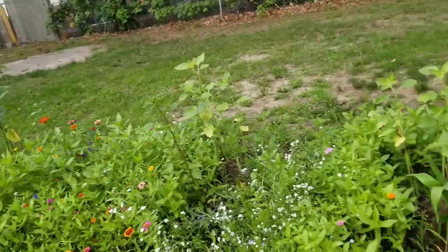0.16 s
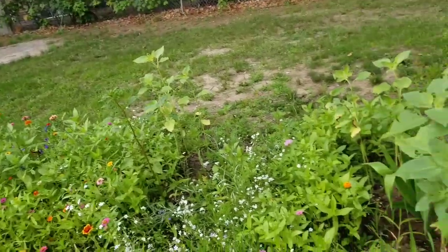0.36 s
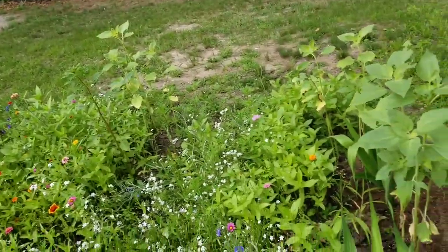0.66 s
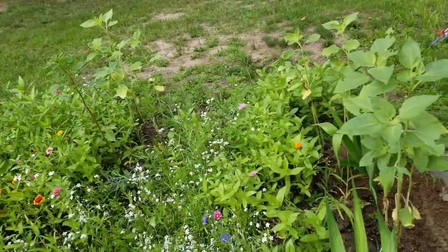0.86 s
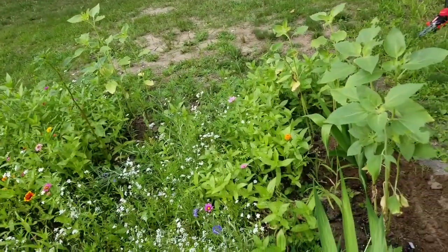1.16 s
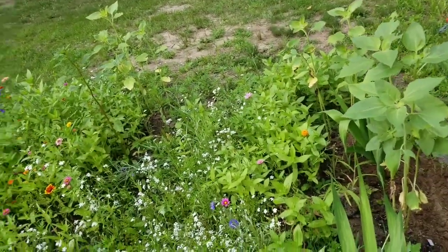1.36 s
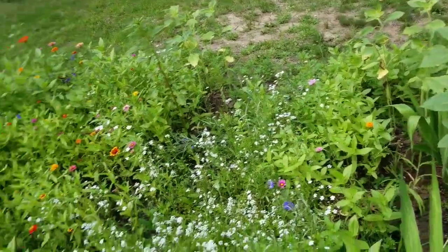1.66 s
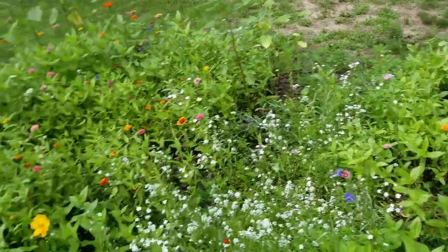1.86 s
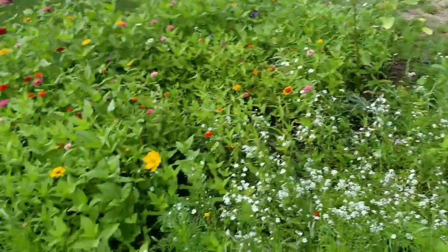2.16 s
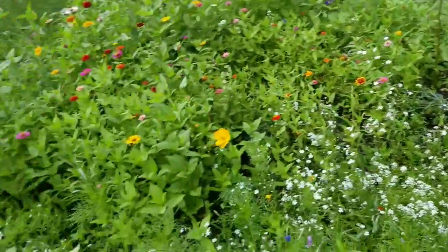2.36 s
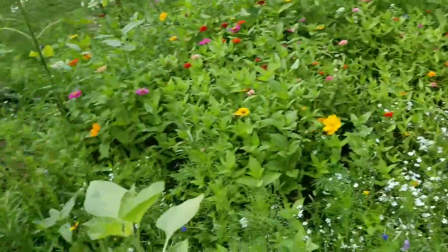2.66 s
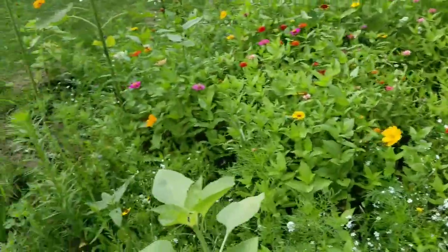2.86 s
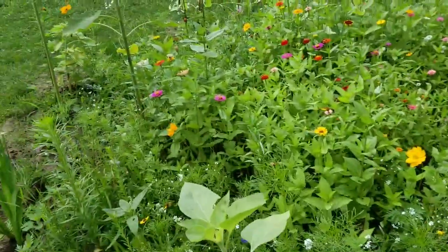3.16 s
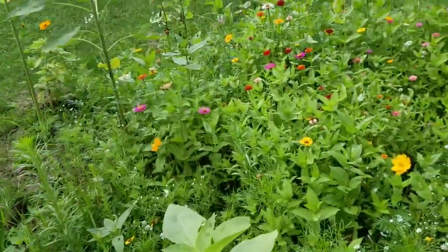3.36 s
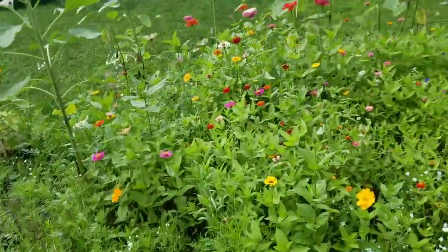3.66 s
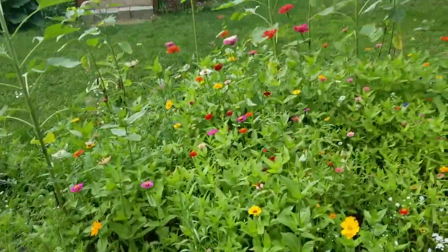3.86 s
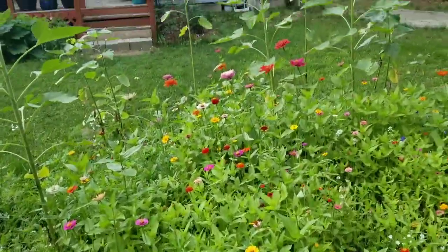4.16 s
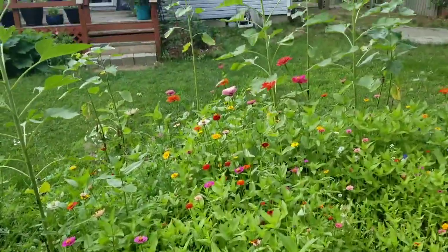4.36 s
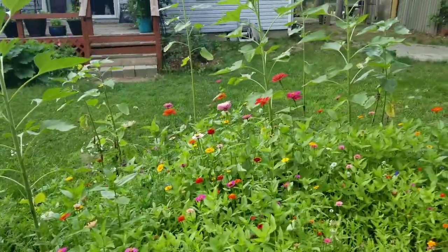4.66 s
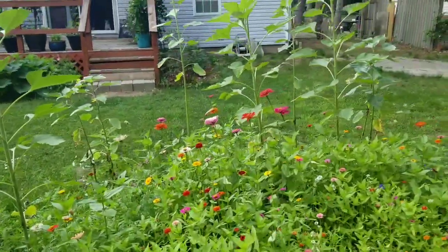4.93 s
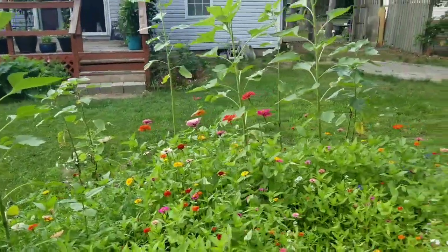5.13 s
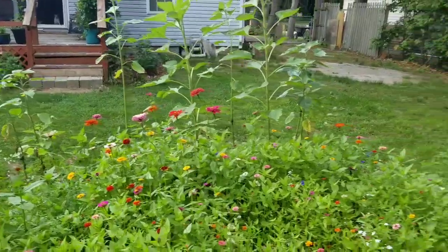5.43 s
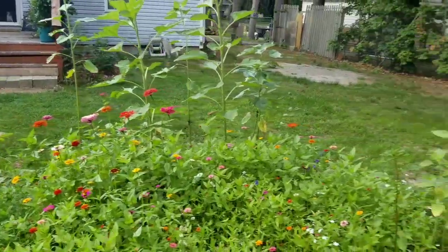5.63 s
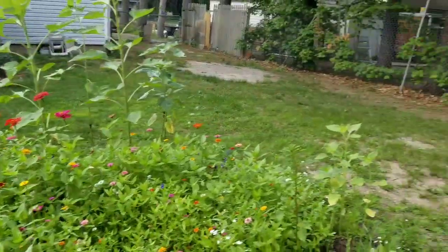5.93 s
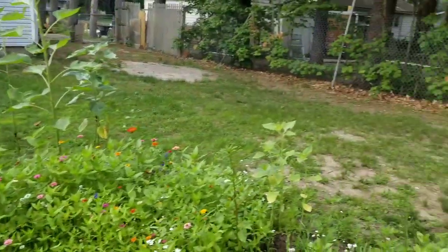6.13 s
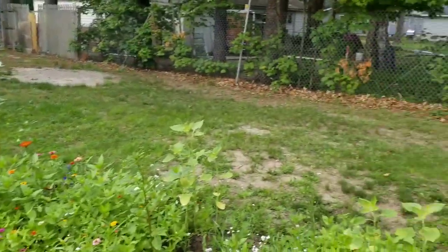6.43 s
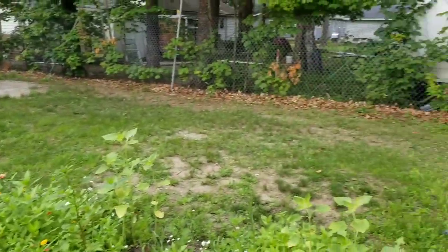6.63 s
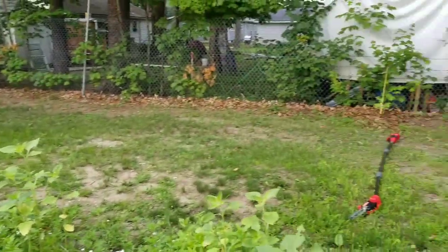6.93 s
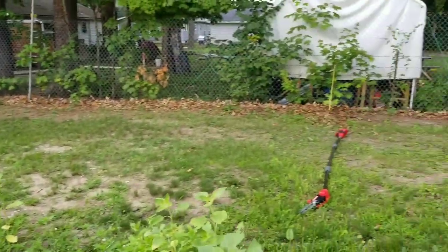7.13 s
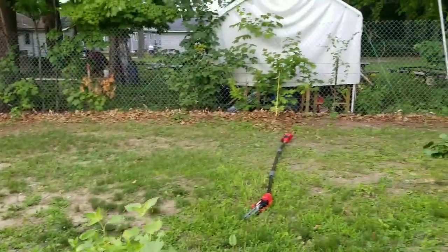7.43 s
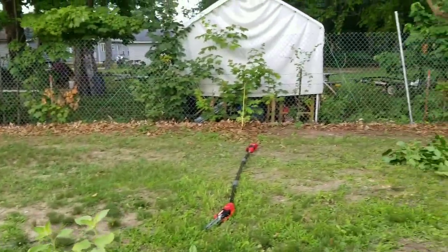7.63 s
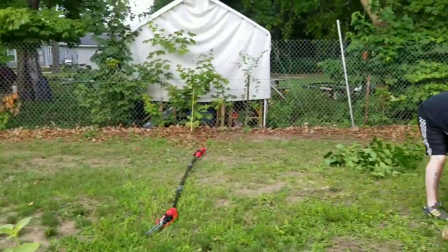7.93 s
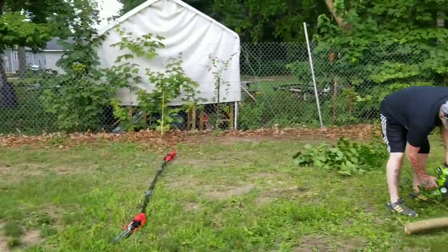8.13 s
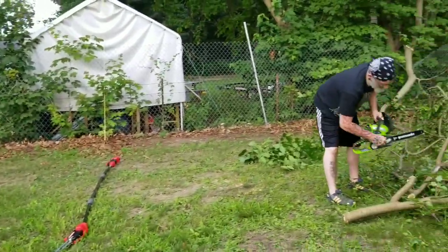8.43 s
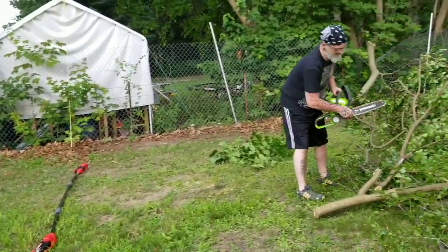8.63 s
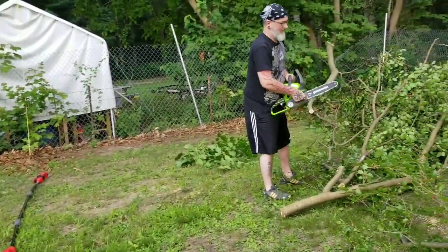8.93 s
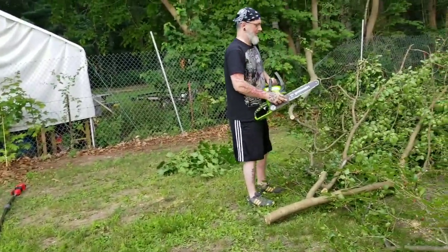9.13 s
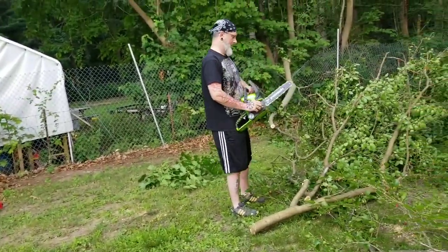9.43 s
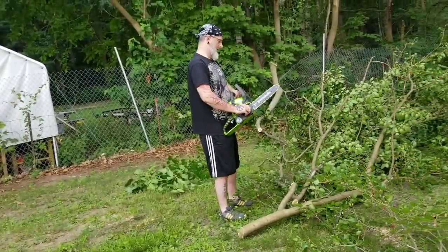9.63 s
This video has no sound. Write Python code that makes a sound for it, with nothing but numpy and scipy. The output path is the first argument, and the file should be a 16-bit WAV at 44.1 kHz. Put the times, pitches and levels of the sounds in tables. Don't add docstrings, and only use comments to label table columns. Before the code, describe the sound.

For the first two seconds the backyard is quiet: low distant traffic rumble, sliding engine drones and a little wind. From about 0.6 s small twigs tick and crack, growing denser, with a loud sharp snap near 2.1 s and rustling leaves. At about 2.4 s an electric chainsaw starts abruptly, reaching full speed within a fraction of a second. Its chain makes a bright, grainy metallic rattle over a motor and gear whine. From 3.3 to 6 s the cut roughens, throbbing with wooden knocks and sharp link slaps. From 6 to 7.7 s knocks thin out and the motor pitch wavers. The bar breaks through around 7.7 s with a short rattle; at 7.9 s the chain is released, its whine falling, ticks slowing and fading until rest near 9.4 s. Traffic and an approaching car's soft tyre roar remain. The saw is brighter and louder on the right.

```python
import sys
import numpy as np
from scipy import signal
from scipy.fft import rfft, irfft
from scipy.io import wavfile

SR = 44100
rng = np.random.default_rng(int(sys.argv[2]) if len(sys.argv) > 2 else 0)


def inscribe(sig):
    pcm = np.round(np.clip(np.atleast_2d(sig).T, -1, 1) * 32767)
    wavfile.write(sys.argv[1], SR, pcm.astype(np.int16))


def to_linear_factor(level_db):
    exponent = np.asarray(level_db, float) / 20
    return 10 ** exponent


N = 431738

# (frequency [Hz], level [dB per Hz])
RUMBLE_COLOUR = [(21, -46), (35, -12.5), (75, -4), (118, -0.5), (152, -7), (188, -9.5), (372, -31.5),
                 (400, -40), (520, -96.5), (880, -120)]
# (time [s], level [dB])
RUMBLE_DB = [(0.0, -53), (0.43, -53), (0.92, -54), (4.31, -55), (7.82, -53), (9.79, -55)]
# (frequency [Hz], level [dB per Hz])
HISS_COLOUR = [(700, -29.5), (1200, -5), (2000, -10), (4500, -8), (7300, -22), (11000, -14.5),
               (15000, -9.5)]
HISS_DB = -75
# (frequency [Hz], level [dB per Hz])
ROAD_COLOUR = [(200, -9.5), (300, 2), (500, -3.5), (850, -4.5), (1100, -17), (1600, -30)]
# (time [s], level [dB])
ROAD_DB = [(0, -74), (2.3, -77.5), (9.0, -62.5), (9.5, -61), (9.79, -66.5)]
# (time [s], level [dB])
BREEZE_DB = [(0, -62), (1.0, -64), (1.9, -64), (2.35, -61), (2.6, -53), (2.85, -62), (3.2, -92),
             (9.79, -70.5)]
# (start [s], stop [s], from [Hz], to [Hz], level [dB])
DRONES = [(-0.5, 0.99, 110, 114.3, -54), (3.5, 5.0, 119.7, 138, -54), (5.6, 6.5, 143.2, 164.2, -53),
          (7.2, 8.35, 125.2, 161.7, -54.5), (8, 9.45, 187, 203, -63), (9, 9.72, 190, 215, -56),
          (8.5, 8.95, 295, 311, -62), (8.5, 9.2, 310, 322, -58.5), (9, 9.9, 320, 342, -63),
          (9.0, 9.4, 497, 466, -64), (9, 10.1, 462, 460, -62.5), (9, 9.7, 507, 500, -66),
          (9, 10.1, 2465, 2610, -88)]

# (time [s], peak [dB], ring [Hz], swish over peak [dB])
TWIGS = [(0.5989, -61, 353, -15), (0.7221, -55, 356, -6), (0.8049, -64, 3560, -10),
         (0.856, -43.5, 344, -18), (1.1262, -53.5, 2010, -10), (1.2279, -49.5, 458, -23),
         (1.313, -58, 11300, -16), (1.3342, -52, 11100, -9), (1.3684, -41, 11350, -1.5),
         (1.385, -49, 2500, -11), (1.394, -40, 1200, -16), (1.405, -35.5, 431, -23),
         (1.634, -50.5, 435, -16), (1.655, -47.5, 11000, -18), (1.676, -48, 11400, -18),
         (1.7633, -37, 1810, -10), (1.9553, -42.5, 498, -0.5), (1.9762, -39, 11100, -32),
         (2.0414, -38.5, 1160, -12), (2.074, -45, 11480, -12), (2.082, -46, 11200, -16),
         (2.091, -16.5, 560, -26), (2.095, -21, 4320, -32), (2.123, -32, 1790, -9.5),
         (2.136, -44, 3000, -13), (2.146, -45, 4500, -13), (2.1582, -42, 4390, -14),
         (2.1845, -35.5, 3850, -14), (2.187, -36.5, 11100, -16), (2.265, -30.5, 4080, -19),
         (2.295, -48, 1910, -9)]
# (time [s], level [dB])
RUSTLE_DB = [(0.0, -64), (0.2, -75.5), (0.55, -76), (0.8, -71), (1.05, -75.5), (1.5, -70), (2.0, -72.5),
             (2.17, -58), (2.4, -64)]
# (frequency [Hz], level [dB per Hz])
LEAVES_COLOUR = [(700, -4), (1500, -4.5), (4300, -3), (6000, -8), (7300, -10), (9000, -5), (11300, 0),
                 (15000, -10.5)]
TWIG_RING_DB, TWIG_DECAY_CYCLES, THIN_TWIG_DB_PER_OCTAVE = -16, 39, 6.5

# (time [s], chain level [dB])
EFFORT_DB = [(2.37, -46), (2.41, -37.5), (2.9, -35.5), (3.15, -36.5), (3.6, -31), (4.1, -33), (4.5, -33.5),
             (5.1, -33.5), (5.6, -32.5), (6.2, -32.5), (6.97, -33), (7.1, -29), (7.23, -35), (7.36, -28.5),
             (7.55, -31), (7.66, -36.5), (7.76, -31.5), (7.94, -39)]
# (time [s], pressure [0-1])
PRESSURE = [(2.4, 0.78), (3.1, 0.78), (3.9, 0.92), (5.5, 1), (5.9, 0.54), (6.3, 0.43), (7.05, 0.2),
            (7.5, 0.36), (7.9, 0.63)]
# (time [s], peak [dB])
SLAPS = [(2.364, -36), (2.3878, -47), (2.4067, -15.5), (2.5105, -20), (2.5559, -19), (2.608, -19.5),
         (2.633, -20), (2.7507, -19), (2.9325, -20), (3.0922, -28), (3.2817, -17.5), (3.3052, -19),
         (3.4204, -15), (3.4878, -19), (3.5107, -14.5), (3.5367, -14), (3.5616, -23), (3.5885, -17),
         (3.614, -18), (3.6399, -21), (3.66, -19), (3.7073, -16.5), (3.731, -11), (3.8235, -20),
         (3.8679, -19.5), (3.8918, -21), (3.9348, -23), (4.186, -21), (4.2146, -20.5), (4.2555, -19),
         (4.2775, -19), (4.351, -11.5), (4.395, -16), (4.488, -14), (4.5119, -18), (4.68, -12.5),
         (4.7025, -21), (4.721, -15), (4.911, -17), (4.981, -22), (5.031, -19), (5.1051, -27),
         (5.1275, -23.5), (5.4174, -18), (5.4423, -22), (5.4887, -20), (5.5875, -17.5), (5.6129, -12),
         (5.636, -11), (5.6598, -13), (5.7277, -21), (5.8725, -20), (5.9453, -16), (6.616, -19),
         (7.286, -23), (7.3107, -10.5), (7.4089, -14.5), (7.5046, -22.5), (7.5276, -19), (7.782, -16.5)]
# (time [s], depth [0-1])
BITE = [(2.4, 0.06), (3.2, 0.3), (3.6, 0.63), (4.3, 0.4), (5.0, 0.34), (5.7, 0.42), (6.2, 0.08),
        (7.0, 0.17), (7.5, 0.22)]
# (frequency [Hz], level [dB per Hz])
CHAIN_LOW_COLOUR = [(1250, -28.5), (1500, -9.5), (1750, -5), (2300, -8.5), (2850, -3.5), (3350, -5.5),
                    (4250, 1.5), (5000, -6), (6500, -8), (7300, -12), (8200, -51)]
# (frequency [Hz], level [dB per Hz])
CHAIN_HIGH_COLOUR = [(6500, -25), (7400, -12.5), (8400, -2.5), (9800, -1.5), (11300, -0.5), (12200, -3),
                     (13000, -4), (14500, -9.5), (15500, -19.5)]
# (frequency [Hz], level [dB per Hz])
COASTING_COLOUR = [(1150, -42), (1450, -10.5), (1700, -0.5), (1900, -5.5), (2800, -4.5), (3400, -2),
                   (4100, 1.5), (4450, 4), (4900, -2.5), (5500, -8), (7300, -12), (8200, -49)]
# (frequency [Hz], level [dB per Hz])
WOOD_COLOUR = [(60, -23), (150, -6.5), (260, -3), (450, 1.5), (600, 5), (800, -23)]
# (frequency [Hz], level [dB per Hz])
HOUSING_COLOUR = [(500, -26), (700, -3.5), (870, -2), (1050, -4), (1250, -3.5), (1450, -7.5), (1800, -35.5)]
# (time [s], level [dB])
HOUSING_SHADE_DB = [(2.4, -6), (2.9, 0), (4.4, 1.5), (5.2, -1), (6.0, -3), (6.8, -2.5), (7.3, -1.5),
                    (7.9, 1), (8.4, 1.5), (9.1, 5.5)]
SPROCKET_HZ = 42.4
RELEASE_S, STOP_S = 7.9, 9.43
COAST_POWER, THINNING_POWER = 1.2, 1.6
LAP_S, LAP_PEAK_S, LAP_DB = 0.38, 4.35, 0.16
BRIGHT_DB, BRIGHT_PRESSED_DB = -0.92, 4
BRIGHT_COAST = 0.47
BRANCH_DB, BRANCH_PRESSED_DB, HOUSING_DB = -21.5, 12, -12
BREAK_S, RATTLE_S, BREAK_DB = 7.72, 0.27, 4.5

# (time [s], speed [turns per s])
MOTOR_HZ = [(2.36, 250), (2.6, 366), (6.1, 370), (6.3, 389), (6.45, 389), (6.56, 371), (6.85, 397),
            (7.05, 406), (7.14, 394), (7.3, 411), (7.45, 356), (7.6, 343), (7.66, 401), (7.73, 411),
            (7.87, 390), (8.03, 336), (8.31, 252), (8.6, 170)]
# (time [s], level [dB])
TORQUE_DB = [(2.36, 0), (2.7, 0), (3.6, -5.5), (4.3, 0.5), (5.0, 1.5), (5.8, 4), (6.15, 2.5), (6.38, -3.5),
             (6.65, 10.5), (6.87, -5), (7.0, 2), (7.15, -12), (7.45, 6.5), (7.58, 4.5), (7.7, -6),
             (7.9, -6), (8.05, -8)]
# (level over chain [dB], share of torque [dB/dB], at full pressure [dB],
#               when free [dB], fading when free [dB per s])
HUM_LINE = (-15.5, 0.66, -6, 12, -59)
MESH_LINE = (-9.5, 1.15, 1, 2, -56)
POLE_LINE = (-24, -3, -6.5, 17.5, -60)
FAN_LINE = (-6.5, -0.8, -6, -3, -70)
MESH_ORDER, POLE_ORDER, FAN_ORDER = 10.5, 14.3, 28.7
# (start [s], stop [s], order [per turn], level [dB])
RUN_DOWN = [
    (8.01, 8.16, 14.3, -43),
    (8.08, 8.2, 13.4, -49),
    (8.23, 8.32, 14.2, -50),
    (8.0, 8.12, 11.0, -49),
]
# (start [s], stop [s], from [Hz], to [Hz], level [dB])
BAR_RINGS = [
    (2.66, 3.45, 2830, 2810, -42),
    (5.7, 6.6, 2825, 2740, -41.5),
    (6.5, 7.4, 2775, 2717, -43),
    (8.75, 9.42, 1820, 1660, -62),
    (8.75, 9.35, 1030, 992, -63),
    (8.3, 8.85, 4530, 4450, -50),
    (8.7, 9.3, 4450, 4380, -58),
]

# (time [s], peak [dB], high mode over peak [dB])
KNOCKS = [(3.278, -33.5, 6), (3.462, -30, 2), (3.755, -26, -2), (3.778, -28.5, -1), (3.823, -32.5, 8.5),
          (3.934, -31, -1), (3.96, -27, -2), (3.982, -27.5, 1), (4.156, -34, 1), (4.183, -33.5, -3),
          (4.208, -25, -4), (4.232, -25.5, -3), (4.254, -26, -4), (4.281, -32, -8), (4.304, -28, -3.5),
          (4.329, -26, -3.5), (4.349, -26.5, -3), (4.372, -26, -1), (4.424, -33, -2), (4.514, -34, 5),
          (4.536, -26.5, -2), (4.655, -31, -8.5), (4.678, -27, -8.5), (4.701, -25, -2.5), (4.723, -26, 3.5),
          (4.748, -26, -3), (4.772, -31, 5), (4.837, -36, -11), (4.866, -37.5, -6.5), (4.912, -31, -6),
          (4.96, -26, -7), (4.981, -29.5, -10), (5.028, -29, -9), (5.176, -30, -1), (5.223, -30.5, -6),
          (5.245, -30, -17), (5.35, -38, -13), (5.438, -30, -13), (5.452, -30, -8), (5.466, -27.5, -8),
          (5.49, -24.5, -4), (5.513, -27.5, -7), (5.56, -39, -6), (5.63, -33.5, -6), (5.655, -29, -5.5),
          (5.727, -25.5, -12), (5.751, -28, -2), (5.785, -30, -8), (5.845, -39.5, -8), (5.867, -37, -3.5),
          (5.936, -31, -7), (6.072, -27.5, -13), (6.218, -27, -4), (6.242, -27, -10), (6.33, -34, -6),
          (6.45, -36, -4), (6.895, -30.5, 1), (7.068, -30.5, 9), (7.304, -30.5, 3), (7.861, -34, -12)]
# (time [s], frequency [Hz])
BRANCH_HZ = [(2.8, 380), (3.7, 496), (4.7, 505), (5.6, 504), (6.2, 405), (7.0, 359), (7.3, 276), (7.9, 384)]

# (time [s], peak [dB])
LOOSE_LINKS = [(6.0496, -24), (6.2871, -26), (6.4771, -22), (6.647, -18), (6.7784, -23), (7.169, -13),
               (7.6589, -21), (8.0267, -28), (8.076, -29), (8.2916, -25), (8.32, -29), (8.33, -21),
               (8.3654, -23), (8.401, -31), (8.45, -34), (8.545, -32), (8.7585, -38.5), (8.8493, -43),
               (8.8682, -39), (8.9251, -43), (8.967, -44), (9.0503, -39), (9.1242, -43), (9.1561, -46)]
TEETH_PER_S2, TEETH_STOP_S = 122, 9.35
TICK_DB, TICK_SPREAD_DB, TICK_T60_S = 10, 5, 0.0071

# (frequency [Hz], level [dB])
SHADOW_COLOUR = [(100, 1), (300, 0.5), (1200, -3), (2500, -7.5), (4000, -15.5), (5400, -7.5), (6300, -11.5),
                 (8000, -13.5), (10000, -7), (13000, -10.5)]
# (time [s], delay [ms])
LAG_MS = [(2.5, 0.39), (3.2, 0.36), (5.3, 0.37), (6.35, 0.47), (7.05, .39), (7.75, 0.266), (8.45, 0.15),
          (9.15, 0.0069)]
# (time [s], left minus right [dB])
TURN_DB = [(2.4, -10.5), (3.24, -10), (3.92, -8), (4.7, -7), (5.5, -8), (6.2, -7.5), (6.8, -8), (7.3, -8.5),
           (7.8, -7), (8.6, -8), (9.4, -9.5)]


def time_s():
    return np.arange(N) / SR


def in_time(rows):
    s, *columns = np.transpose(rows)
    return [np.interp(time_s(), s, c) for c in columns]


def gate(start_s, stop_s, fade):
    return np.clip(np.minimum(time_s() - start_s, stop_s - time_s()) / fade, 0, 1)


def rms_one(x):
    return x / np.sqrt(np.mean(x ** 2) + 1e-20)


def coloured(x, points, size=8192):
    hz, level_db = np.transpose(points)
    grid_hz = np.maximum(np.arange(size // 2 + 1) * SR / size, 1)
    gain = to_linear_factor(np.interp(np.log(grid_hz), np.log(hz), level_db))
    cepstrum = irfft(np.log(gain))
    cepstrum[1:size // 2] *= 2
    cepstrum[size // 2 + 1:] = 0
    impulse = irfft(np.exp(rfft(cepstrum)))[:size // 2]
    return signal.oaconvolve(x, impulse)[:N]


def noise(colour):
    return rms_one(coloured(rng.standard_normal(N), colour))


def drift(rate_hz, size=N):
    r = np.exp(-2 * np.pi * rate_hz / SR)
    slow = signal.lfilter([1], [1, -2 * r, r * r], rng.standard_normal(size + 8000))
    return rms_one(slow[8000:])


def grains(per_s, spread_db):
    sizes = to_linear_factor(spread_db * np.minimum(rng.exponential(1, N), 5))
    signs = rng.choice([-1, 1], N)
    return sizes * signs * (rng.random(N) < per_s / SR)


def bursts(times_s, heights, t60s, rise_s):
    out, t = np.zeros(N + SR), np.arange(SR // 4) / SR
    for s, height, t60 in zip(times_s, heights, t60s):
        first = int(s * SR)
        out[first:first + len(t)] += height * np.minimum(t / rise_s, 1) * to_linear_factor(-60 * t / t60)
    return out[:N]


def whine(hz, width_hz, steady):
    phase = 2 * np.pi * np.cumsum(hz) / SR
    in_phase = (steady + drift(width_hz, size=len(hz))) * np.cos(phase)
    quadrature = drift(width_hz, size=len(hz)) * np.sin(phase)
    return rms_one(in_phase + quadrature)


def glides(rows, width_hz, steady, fade):
    out = np.zeros(N)
    for start, stop, from_hz, to_hz, level_db in rows:
        swell = gate(start, stop, fade)
        heard = swell > 0
        hz = np.interp(time_s()[heard], [start, stop], [from_hz, to_hz])
        out[heard] += to_linear_factor(level_db) * swell[heard] * whine(hz, width_hz, steady)
    return out


def drones():
    return glides(DRONES, width_hz=8, steady=1.1, fade=0.15)


def traffic():
    rumble = noise(RUMBLE_COLOUR) * to_linear_factor(in_time(RUMBLE_DB)[0] + 1.0 * drift(1.4))
    breeze = noise([(22, -38), (38, 2.5), (55, 3.5), (100, -47.0)])
    breeze = breeze * to_linear_factor(in_time(BREEZE_DB)[0] + 1.6 * drift(2.4)) * gate(-1, 3.3, fade=0.3)
    road_gain = to_linear_factor(in_time(ROAD_DB)[0])
    shared_road = noise(ROAD_COLOUR)
    sides = []
    for side in range(2):
        road = road_gain * (0.6 * shared_road + 1.0 * noise(ROAD_COLOUR))
        sides.append(to_linear_factor(-66) * noise(RUMBLE_COLOUR) + road + to_linear_factor(HISS_DB) * noise(HISS_COLOUR))
    return rumble + breeze + drones() + np.array(sides)


def brush():
    s, peak_db, ring_hz, swish_db = np.transpose(TWIGS)
    snaps = bursts(s, to_linear_factor(peak_db - 1.5), np.full(len(s), 0.016), rise_s=0.0008)
    swish = bursts(s, to_linear_factor(peak_db + swish_db), np.full(len(s), 0.14), rise_s=0.02)
    rings, t = np.zeros(N), np.arange(SR // 8) / SR
    heights = to_linear_factor(peak_db + TWIG_RING_DB + THIN_TWIG_DB_PER_OCTAVE * np.log2(ring_hz / 500))
    for at, height, hz in zip((s * SR).astype(int), heights, ring_hz):
        decay = to_linear_factor(-60 * t * hz / TWIG_DECAY_CYCLES)
        rings[at:at + len(t)] += height * np.sin(2 * np.pi * hz * t) * decay
    rustle = to_linear_factor(in_time(RUSTLE_DB)[0] + 1.5 * drift(30)) * gate(-1, 2.7, fade=0.019)
    leaves = rms_one(coloured(grains(per_s=13000, spread_db=3.5), LEAVES_COLOUR))
    return rings + (snaps + swish + rustle) * leaves


def coast_db():
    speed = np.clip((STOP_S - time_s()) / (STOP_S - RELEASE_S), 0.003, 1)
    return COAST_POWER * 20 * np.log10(speed)


def chain_level_db():
    lap_db = LAP_DB * np.cos(2 * np.pi * (time_s() - LAP_PEAK_S) / LAP_S)
    return in_time(EFFORT_DB)[0] + lap_db + coast_db()


def throb(blow_s):
    turns = np.cumsum(np.maximum(np.round(np.diff(blow_s, prepend=0) * SPROCKET_HZ), 1))
    since = (np.interp(time_s(), blow_s, turns) + 0.22) % 1
    pulse = 2.5 * since * np.exp(1 - 3.64 * since) * 1.11
    return 1 + np.clip(in_time(BITE)[0], 0, 1) * (pulse - 1)


def chain(blow_s):
    chain_db, pressure = chain_level_db(), in_time(PRESSURE)[0]
    thinned = np.maximum(to_linear_factor(THINNING_POWER * coast_db()), 0.22)
    links = grains(per_s=13000 * thinned, spread_db=2.0) / np.sqrt(thinned)
    links = links * to_linear_factor(0.37 * drift(62)) * throb(blow_s)
    low_links = rms_one(coloured(links, CHAIN_LOW_COLOUR))
    high_links = rms_one(coloured(links, CHAIN_HIGH_COLOUR))

    free = gate(7.98, 12, fade=0.15)
    low = (1 - free) * low_links + free * rms_one(coloured(links, COASTING_COLOUR))
    low = low * to_linear_factor(chain_db + 3.0 + 0.28 * drift(36))
    bright_db = BRIGHT_DB + BRIGHT_PRESSED_DB * pressure + BRIGHT_COAST * coast_db()
    high = high_links * to_linear_factor(chain_db + bright_db + 2.5 - 1.84 * free + 1.1 * drift(98))
    branch_db = BRANCH_DB + BRANCH_PRESSED_DB * pressure + 3.0 + 1.6 * drift(14.0)
    branch = rms_one(coloured(links, WOOD_COLOUR)) * to_linear_factor(chain_db + branch_db)
    rattle_db = BREAK_DB * gate(BREAK_S, BREAK_S + RATTLE_S, fade=0.03)
    housing_db = HOUSING_DB + in_time(HOUSING_SHADE_DB)[0] + rattle_db + 4.5 + 2.0 * drift(11.7)
    housing = rms_one(coloured(links, HOUSING_COLOUR)) * to_linear_factor(chain_db + housing_db)

    s, peak_db = np.transpose(SLAPS)
    slaps = bursts(s - 0.0015, to_linear_factor(peak_db - 5.0), np.full(len(s), 0.03), rise_s=0.0016)
    slaps = slaps * (high_links + to_linear_factor(-14.5) * low_links)
    spin_up = gate(2.362, 9.6, fade=0.012)
    return (low + high + branch + housing) * spin_up + slaps


def motor():
    turns_hz, torque_db, pressure = in_time(MOTOR_HZ)[0], in_time(TORQUE_DB)[0], in_time(PRESSURE)[0]
    free, free_s = gate(7.68, 12, fade=0.18), np.maximum(time_s() - 8.3, 0)
    chain_db, drivers = chain_level_db(), [np.ones(N), torque_db, pressure, free, free_s]
    lines = (HUM_LINE, MESH_LINE, POLE_LINE, FAN_LINE)
    hum_db, mesh_db, pole_db, fan_db = (chain_db + np.dot(line, drivers) for line in lines)

    hum = to_linear_factor(hum_db) * whine(turns_hz, width_hz=10, steady=1.2)
    mesh = to_linear_factor(mesh_db) * whine(MESH_ORDER * turns_hz, width_hz=50, steady=0.6)
    pole = to_linear_factor(pole_db - 3) * whine(POLE_ORDER * turns_hz, width_hz=25, steady=0.5)
    pole = pole + to_linear_factor(pole_db - 8) * whine((POLE_ORDER - 1) * turns_hz, width_hz=20, steady=0.3)
    pole = coloured(pole, COASTING_COLOUR) * gate(2, 7.7, fade=0.1)
    for start, stop, order, level_db in RUN_DOWN:
        heard = slice(int(start * SR), int(stop * SR))
        swell = gate(start, stop, fade=0.04)[heard]
        pole[heard] += to_linear_factor(level_db) * swell * whine(order * turns_hz[heard], width_hz=25, steady=1.5)
    fan = to_linear_factor(fan_db) * whine(FAN_ORDER * turns_hz, width_hz=60, steady=1.0)
    fan = fan * gate(2, 8.0, fade=0.15)
    bar = glides(BAR_RINGS, width_hz=35, steady=0.6, fade=0.2)
    return (hum + mesh + pole + fan + bar) * gate(2.37, 10.0, fade=0.13)


def knocks(blow_s, blow_db, high_db):
    out, t = np.zeros(N + SR), np.arange(SR // 16) / SR
    high_mode = np.sin(2 * np.pi * 1750 * t) * to_linear_factor(3.0 - 60 * t / 0.012)
    branch_hz = in_time(BRANCH_HZ)[0]
    for s, peak_db, upper_db, luck in zip(blow_s, blow_db, high_db, rng.standard_normal(len(blow_s))):
        first = int(s * SR)
        hz = branch_hz[first] * (1 + 0.059 * luck)
        low_mode = np.sin(2 * np.pi * hz * t) * to_linear_factor(3.0 - 60 * t / 0.03)
        ring = low_mode + high_mode * to_linear_factor(upper_db + 6.5)
        out[first:first + len(t)] += ring * np.minimum(t / 0.0025, 1) * to_linear_factor(peak_db)
    blows = bursts(blow_s, to_linear_factor(blow_db), np.full(len(blow_s), 0.035), rise_s=0.0029)
    cracks = to_linear_factor(-5.0) * noise(CHAIN_LOW_COLOUR)
    thumps = to_linear_factor(-4.5) * noise(WOOD_COLOUR)
    return out[:N] + blows * (cracks + thumps)


def ticks():
    teeth_per_s = TEETH_PER_S2 * np.maximum(TEETH_STOP_S - time_s(), 0) * (time_s() > RELEASE_S)
    passed = np.cumsum(teeth_per_s) / SR
    at = np.flatnonzero(np.diff(np.floor(passed)))
    luck = rng.standard_normal((300, 2))[:len(at)]
    level_db = (chain_level_db() + BRIGHT_COAST * coast_db())[at]
    level_db = level_db + TICK_DB + TICK_SPREAD_DB * np.tanh(luck[:, 0])
    heights = gate(RELEASE_S + 0.05, 12, fade=0.4)[at] * to_linear_factor(level_db)
    tick_s = at / SR + 0.0008 * luck[:, 1]
    hits = bursts(tick_s, heights, np.full(len(at), TICK_T60_S), rise_s=0.0002)
    s, peak_db = np.transpose(LOOSE_LINKS)
    hits = hits + bursts(s, to_linear_factor(peak_db - 1.0), np.full(len(s), 0.009), rise_s=0.0004)
    low_pass = signal.butter(2, 12000, fs=SR, output="sos")
    ring = signal.sosfilt(low_pass, rng.standard_normal(N))
    return hits * rms_one(coloured(ring, CHAIN_HIGH_COLOUR))


def scatter(x, t60_s, level_db):
    t = np.arange(int(t60_s * SR)) / SR
    echoes = rng.standard_normal((2, len(t))) * to_linear_factor(-60 * t / t60_s)
    first, second = (signal.oaconvolve(x, e / np.sqrt(np.sum(e ** 2)))[:N] for e in echoes)
    angle = 2.5 * drift(5)
    out = np.cos(angle) * first + np.sin(angle) * second
    high_pass = signal.butter(2, 2300, "high", fs=SR, output="sos")
    return to_linear_factor(level_db) * signal.sosfilt(high_pass, out)


def two_microphones(x):
    lag_samples = in_time(LAG_MS)[0] * SR / 1000
    late = np.interp(np.arange(N) - lag_samples, np.arange(N), x)
    left = coloured(late + scatter(x, t60_s=0.04, level_db=5.0), SHADOW_COLOUR)
    left = left * to_linear_factor(in_time(TURN_DB)[0] + 5.0)
    right = x + scatter(x, t60_s=0.049, level_db=-14.5)
    return np.array([left, right])


def scene():
    blow_s, blow_db, high_db = np.transpose(KNOCKS)
    saw = chain(blow_s) + ticks() + motor() + knocks(blow_s, blow_db + 4.0, high_db)
    return two_microphones(saw + brush()) + traffic()


def top_cut(x):
    return signal.sosfilt(signal.butter(12, 16470, fs=SR, output="sos"), x)


def record(dry):
    high_pass = signal.butter(2, 30, "high", fs=SR, output="sos")
    low_pass = signal.cheby2(18, 60, 15800, fs=SR, output="sos")
    mix = signal.sosfilt(low_pass, signal.sosfilt(high_pass, dry))
    return top_cut(mix)


dry = scene()
out = record(dry)
inscribe(out)
```